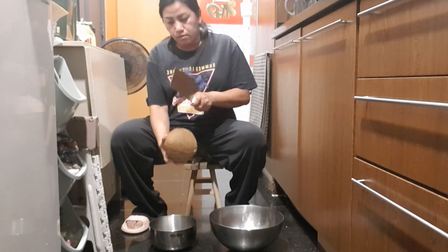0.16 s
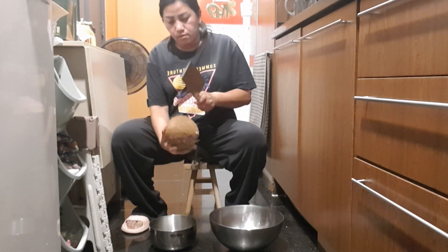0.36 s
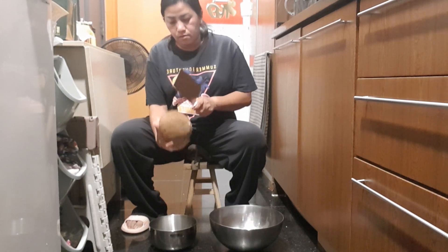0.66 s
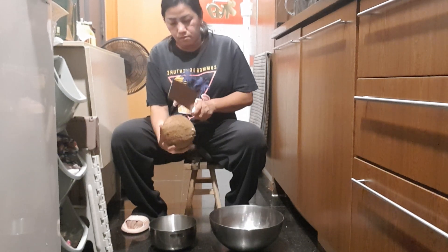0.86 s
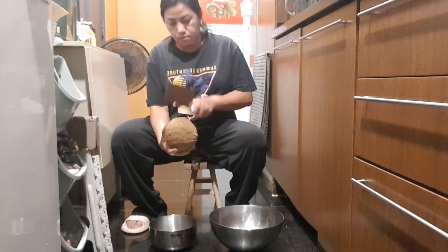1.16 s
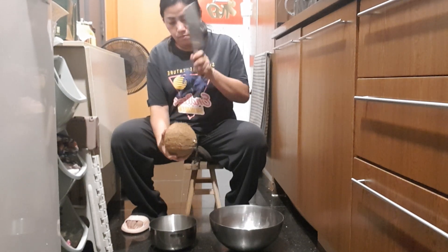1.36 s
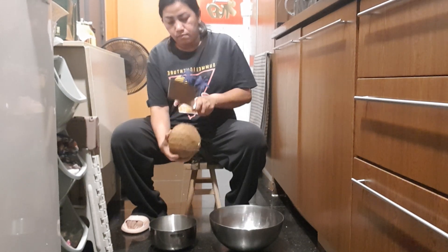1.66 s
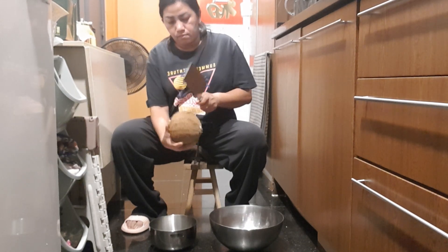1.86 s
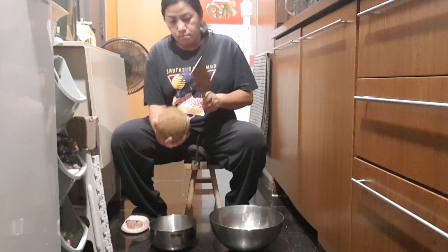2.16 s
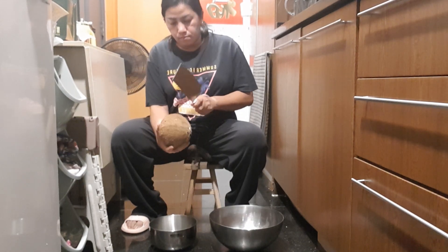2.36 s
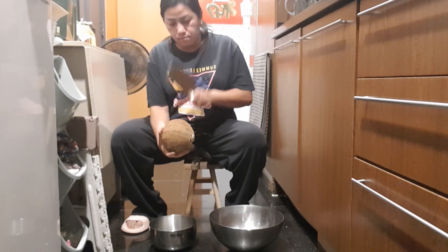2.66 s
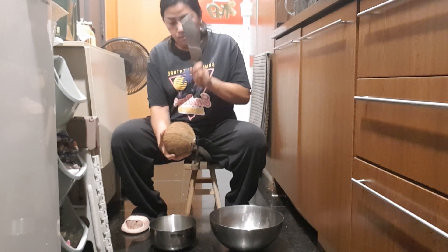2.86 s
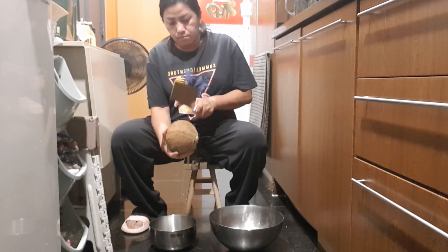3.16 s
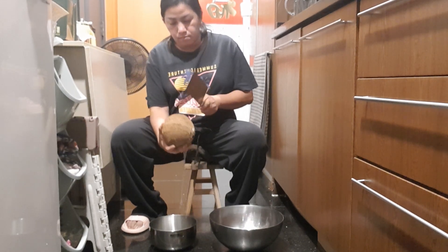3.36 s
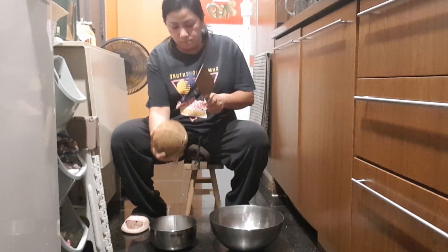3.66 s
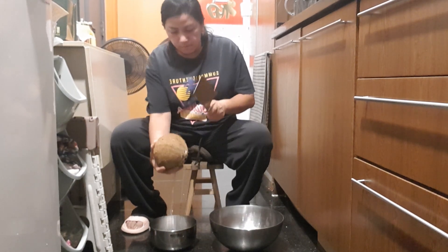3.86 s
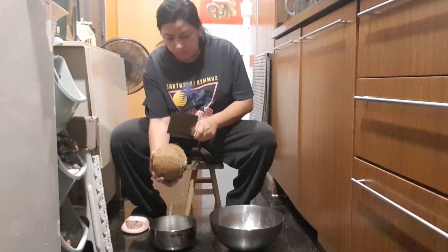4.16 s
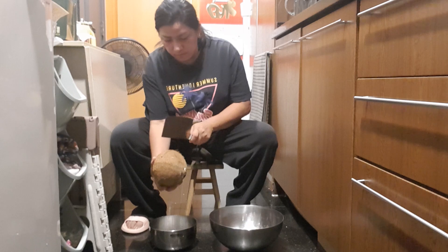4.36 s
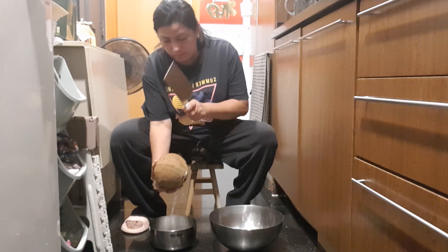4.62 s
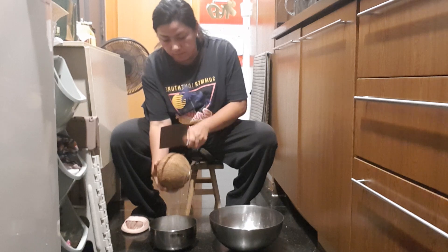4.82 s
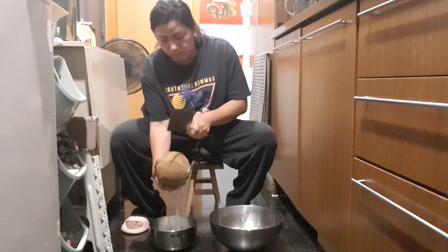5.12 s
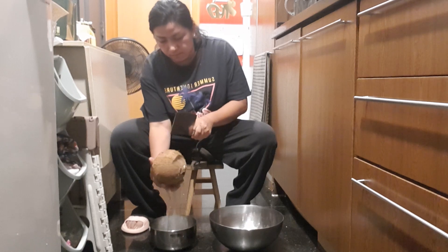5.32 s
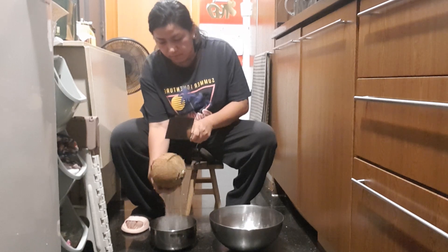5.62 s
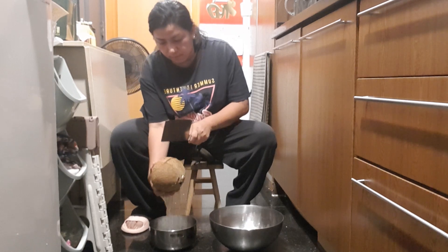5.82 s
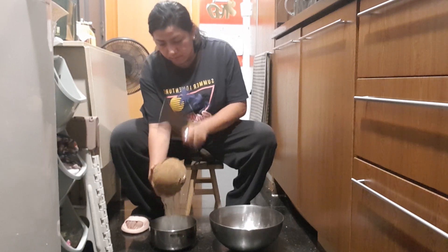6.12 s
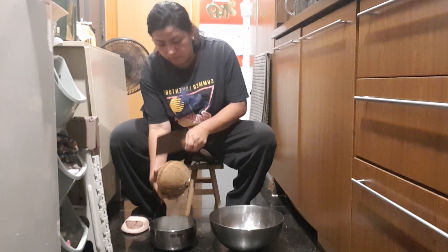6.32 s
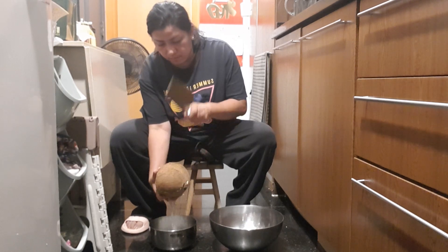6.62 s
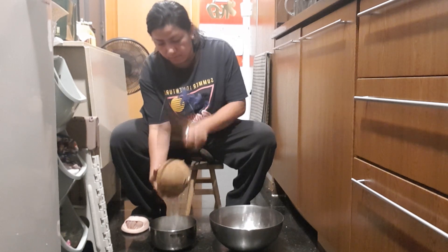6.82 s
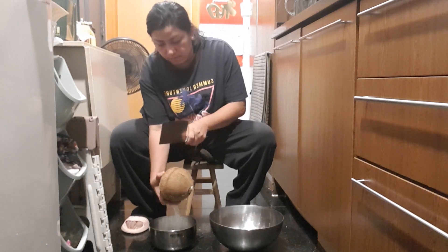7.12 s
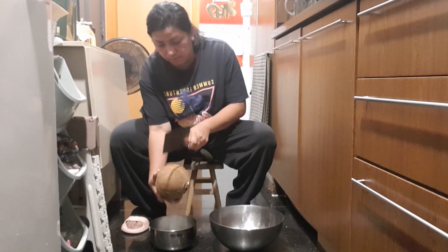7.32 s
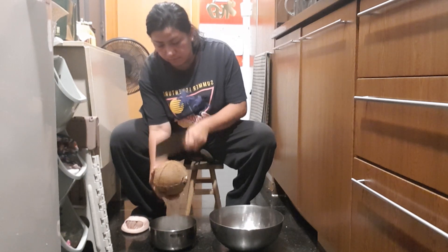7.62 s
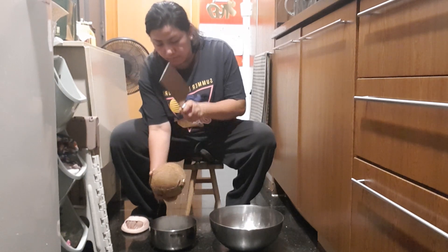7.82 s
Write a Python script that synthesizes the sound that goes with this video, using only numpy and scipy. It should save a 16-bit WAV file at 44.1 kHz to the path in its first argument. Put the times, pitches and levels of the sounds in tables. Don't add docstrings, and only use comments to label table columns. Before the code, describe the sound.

Sharp, dry knocks of a heavy blade on hard shell, each with a brief steel ring and short room slap. Soft fibre rustles come between early blows. After the splitting hit, single drops and a thin splashy trickle land in a metal bowl while the knocks turn hollow and boomy. Low fan rumble runs throughout, with a fridge hum rising past five seconds, heard from a phone on the floor nearby.

```python
import sys
import numpy as np
from scipy import signal
from scipy.fft import rfft, irfft, next_fast_len
from scipy.io import wavfile
from scipy.ndimage import uniform_filter1d

SR = 44100
rng = np.random.default_rng(int(sys.argv[2]) if len(sys.argv) > 2 else 0)


def field_ratio(decibels):
    return 10 ** (np.asarray(decibels, dtype=float) / 20)


def unload_audio(sound):
    columns = np.transpose(np.atleast_2d(sound))
    steps = np.round(np.clip(columns, -1, 1) * 32767)
    wavfile.write(sys.argv[1], SR, steps.astype(np.int16))


N = 351918
TIME = np.arange(N) / SR
ONSET_DELAY_S = 0.0012

# frequency in Hz, density in dB per Hz.
HUM_SPECTRUM = [(15, -45.5), (27, -20), (59, 0), (99, -2.5), (129, -5.5), (324, -14), (361, -11),
                (460, -12), (498, -14), (555, -11.5), (977, -22), (1090, -23.5), (2510, -32), (7380, -62),
                (11000, -47.5), (15700, -55.5)]
# frequency in Hz, correlation from 0 to 1.
PORT_LIKENESS = [(40, .45), (75, .8), (130, 0.95), (300, 0.95), (640, 0.45), (1400, 0.13)]
# frequency in Hz, level in dB.
LEFT_EXCESS = [(40, 6.5), (130, .5), (400, 2), (1300, 1.5), (2400, 5.5), (5000, 6), (15000, 5)]
# start in seconds, blade edge in dB, shell body in dB, cavity in Hz, cavity in dB.
BLOWS = [
    (0.08, -9, -16, 363, -33.5),
    (0.9714, -32, -34, 393, -48),
    (1.574, -8, -14, 354, -26.5),
    (2.539, -29, -24, 386, -32.5),
    (3.004, -10.5, -14.5, 355, -11.5),
    (4.822, -12, -14.5, 380, -10),
    (6.203, -11.5, -12.5, 325.7, -6.5),
    (6.892, -13.5, -10, 373, -5),
    (7.496, -54, -39, 313, -19),
    (7.9735, -13, -13.5, 393, -11.5),
]
# frequency in Hz, level in dB, T60 in seconds.
SHELL_MODES = [(496, -4, 0.031), (575, -6, 0.022), (720, -4, 0.0076), (891, -11.5, 0.054),
               (1120, -9, 0.004), (1330, -11, 0.0029)]
# ratio to the knock frequency, level in dB, T60 in seconds.
KNOCK_PARTIALS = [(0.751, -13.5, 0.002), (1.35, 7, 0.0027)]
# centre in Hz, T60 in seconds, early reflections in dB.
ROOM_BANDS = [(141, 0.33, 11.5), (560, 0.27, -9.5), (2300, .32, 3.5), (10000, 0.31, 6)]
# frequency in Hz, gain in dB.
PORT_RESPONSE = [(30, -26), (90, 2.5), (200, 1.5), (3000, -1), (5500, -7), (7400, -12.5), (8800, -2),
                 (10500, 0), (13000, -7), (16000, -8.5)]
# start in seconds, low blade modes in dB, long ring in dB, high blade modes in dB.
STEEL_RINGS = [
    (.08, -31, -53, -37),
    (.973, -45, -80, -70),
    (1.575, -21.5, -53.5, -48),
    (2.541, -59, -62.5, -52),
    (3.004, -24, -62.5, -41),
    (4.823, -40, -72, -53),
    (6.204, -54, -66, -27),
    (6.893, -31.5, -70, -56),
]
# frequency in Hz, level in dB, T60 in seconds.
BLADE_LOW_MODES = [(1995, 0, .4)]
# frequency in Hz, level in dB, T60 in seconds.
LONG_RING_MODES = [(3890, 0, 1.5), (3896, -9, 1.3)]
# frequency in Hz, level in dB, T60 in seconds.
BLADE_HIGH_MODES = [(5696, -8, .2), (6244, -5, .2), (8455, -5, .28), (9150, -4, .18), (9685, -7, .25)]
# middle in seconds, length in seconds, level in dB.
HUSK_TURNS = [
    (0.568, 0.098, -60.5),
    (0.694, 0.11, -65.5),
    (2.037, 0.2, -63),
    (2.167, 0.1, -76),
]
# frequency in Hz, level in dB, T60 in seconds.
BOWL_MODES = [(854, -1, .3), (861, -5, .25), (1410, -1, .3), (1420, -6, .2), (2950, -8, .08),
              (4330, -8, .08)]
# time in seconds, flow in dB.
FLOW = [(3.2, -80), (3.4, -70), (3.57, -74.5), (3.68, -53), (3.81, -66), (4.06, -56), (4.22, -63.5),
        (4.4, -56.5), (4.55, -55), (4.8, -74.5), (5.0, -55.5), (5.22, -55.5), (5.5, -50.5), (5.65, -50.5),
        (6.3, -53), (6.6, -55), (7.14, -60.5), (7.98, -63.5)]
# start in seconds, splash in dB, bubble in Hz, bubble in dB.
DROPS = [(2.939, -62.5, 1800, -66.5), (3.3074, -44, 1600, -81), (3.3428, -43, 1520, -76),
         (3.4231, -40.5, 4050, -64), (3.6104, -38, 1500, -66), (3.7068, -32.5, 4430, -45.5),
         (3.8472, -27, 4070, -44), (3.9644, -34.5, 1940, -53), (4.0294, -43, 6160, -49),
         (4.0926, -41, 3200, -54), (4.2708, -43, 1620, -65), (4.374, -36, 4520, -47),
         (4.44, -30.5, 3000, -47), (4.5136, -35, 2950, -48), (4.559, -33, 4360, -45),
         (4.657, -35.5, 2350, -57), (5.0619, -31, 5400, -47), (5.1183, -32, 4360, -56),
         (5.445, -30.5, 1590, -52), (5.4982, -34, 4240, -46.5), (5.7172, -39.5, 3320, -42.5),
         (5.7527, -25.5, 1710, -40.5), (5.8561, -35, 2040, -51), (6.464, -44, 4200, -45.5),
         (6.6042, -45, 4250, -47.5), (7.0853, -39, 1900, -58), (7.3298, -44, 4120, -48),
         (7.5903, -38.5, 3060, -50.5), (7.6515, -35.5, 3050, -68), (7.7593, -54, 1900, -49)]
# start in seconds, level in dB.
WALL_TAPS = [
    (3.68, -57.5),
    (3.8472, -51.5),
    (3.9635, -57),
    (4.0294, -58),
    (4.0926, -56.5),
    (5.3389, -60),
]


def on_log(table, hz):
    table_hz, value = np.transpose(table)
    return np.interp(np.log(hz + 1), np.log(table_hz), value)


def unit(x):
    return x / np.sqrt(np.mean(x ** 2))


def band(x, lo_hz, hi_hz):
    sos = signal.butter(2, [lo_hz, min(hi_hz, SR / 2.2)], "band", fs=SR, output="sos")
    return signal.sosfilt(sos, x)


def ring(hz, t60_s, t):
    return np.sin(2 * np.pi * hz * t) * 1000. ** (-t / np.maximum(t60_s, .002))


def ring_all(modes, t, scatter_db, detune):
    out = np.zeros(len(t))
    for hz, db, t60_s in modes:
        strength, shift = rng.standard_normal(2)
        out += field_ratio(db + scatter_db * strength) * ring(hz * (1 + detune * shift), t60_s, t)
    return out


def add(track, start_s, x):
    i = int(start_s * SR)
    track[i:i + len(x)] += x[:N - i]


def ports(envelopes):
    hz = np.fft.rfftfreq(envelopes.shape[-1], 1 / SR)
    likeness = np.clip(on_log(PORT_LIKENESS, hz), 0, 1)
    mid, side = rfft(rng.standard_normal(envelopes.shape) * envelopes)
    common = np.sqrt(1 + likeness) * mid
    differing = np.sqrt(1 - likeness) * side
    lean = field_ratio(on_log(LEFT_EXCESS, hz) / 2)
    return hz, np.array([lean * (common + differing), (common - differing) / lean])


def hum():
    flicker = field_ratio(0.43 * unit(uniform_filter1d(rng.standard_normal((2, N)), 4000)))
    hz, pair = ports(flicker)
    air = irfft(pair * field_ratio(on_log(HUM_SPECTRUM, hz)), N)
    air *= field_ratio(-46) / np.std(air.mean(axis=0))

    start_s, rise_s, motor_hz, wobble_hz = 5.3, 0.49, 135.7, 6.23
    motor_db, throb_db, ease_start_s, ease_db_per_s = -48, 4, 7.3, -11.5
    running = np.clip((TIME - start_s) / rise_s, 0, 1)
    wobble = unit(uniform_filter1d(rng.standard_normal(N), 1500))
    phase = 2 * np.pi * np.cumsum(motor_hz + wobble_hz * wobble) / SR
    level_db = motor_db + throb_db * np.roll(wobble, SR)
    level_db += ease_db_per_s * np.maximum(TIME - ease_start_s, 0)
    return air + np.sqrt(2) * running * field_ratio(level_db) * np.sin(phase)


def blow_low(edge_db, cavity_hz, cavity_db, force_db, splits, t):
    thump_db, thump_t60_s = (-14, 0.22) if splits else (edge_db - 14.5, .08)
    cavity_t60_s = 0.049 * np.exp(-0.024 * force_db)
    thump = ring(118, thump_t60_s, t) + 0.78 * ring(205, thump_t60_s, t)
    cavity = ring(cavity_hz, cavity_t60_s, t) + 0.52 * ring(1.14 * cavity_hz, 0.038, t)
    low = field_ratio(thump_db - 1) * thump + field_ratio(cavity_db + 5.5) * cavity
    return low * (1 - np.exp(-t / 0.0023))


def blow_contact(edge_db, body_db, force_db, opened, t):
    knock_hz = 2018 + 12 * force_db
    knock = [(knock_hz, 0, 0.0044 * np.exp(-.04 * force_db))]
    knock += [(ratio * knock_hz, db, t60_s) for ratio, db, t60_s in KNOCK_PARTIALS]
    open_db = -4 * opened
    hit = field_ratio(body_db + 7) * ring_all(SHELL_MODES, t, scatter_db=4.0, detune=0.02)
    hit += field_ratio(edge_db + open_db + 14) * ring_all(knock, t, scatter_db=1.05, detune=0.012)
    return band(hit, 260, 2400)


def blow_fibres(force_db, opened, t):
    grit = 0.45 * rng.standard_normal((2, len(t))) * np.exp(-t / 0.0054)
    grit[:, 0] += 4
    splinter_db = -10 + 1.51 * force_db
    crack_db = -25 + 1.85 * force_db + 6 * opened
    splinters = field_ratio(splinter_db + 14) * band(grit[0], 3670, 6770)
    return splinters + field_ratio(crack_db + 23) * band(grit[1], 7000, 15000)


def blows():
    split_s, full_blow_db = 3.003, -10
    hits, boom, t = np.zeros(N), np.zeros(N), TIME[:SR // 4]
    for start_s, edge_db, body_db, cavity_hz, cavity_db in BLOWS:
        opened = start_s > split_s + 1
        splits = abs(start_s - split_s) < .1
        force_db = edge_db - full_blow_db
        low = blow_low(edge_db, cavity_hz, cavity_db, force_db, splits, t)
        hit = blow_contact(edge_db, body_db, force_db, opened, t)
        hit += blow_fibres(force_db, opened, t)
        add(hits, start_s + ONSET_DELAY_S, hit + field_ratio(-5) * low)
        add(boom, start_s + ONSET_DELAY_S, low)
    return hits, boom


def reflections():
    early_s, rise_s = 0.0036, .0004
    t, response = TIME[:2 ** 15], 0
    for centre_hz, t60_s, early_db in ROOM_BANDS:
        fade = 1000. ** (-t / t60_s)
        fade *= (1 + field_ratio(early_db) * np.exp(-t / early_s)) * (1 - np.exp(-t / rise_s))
        hz, pair = ports(np.array([fade, fade]))
        share = on_log([(f, float(f == centre_hz)) for f, *_ in ROOM_BANDS], hz)
        response = response + np.sqrt(share) * pair / np.sqrt(2 * np.sum(fade ** 2))
    return irfft(response * field_ratio(on_log(PORT_RESPONSE, hz)))[:, :-2 ** 13]


def room(x):
    count, places_per_s = 6, 61.3
    size = next_fast_len(N + 2 ** 15)
    place = TIME * places_per_s % count
    total = 0
    for k in range(count):
        distance = np.abs((place - k + count / 2) % count - count / 2)
        stay = np.sqrt(np.clip(1 - distance, 0, 1))
        total = total + rfft(reflections(), size) * rfft(x * stay, size)
    return irfft(total, size)[:, :N]


def steel():
    out = np.zeros((2, N))
    for start_s, low_db, long_db, high_db in STEEL_RINGS:
        groups = ((low_db, BLADE_LOW_MODES), (long_db, LONG_RING_MODES), (high_db, BLADE_HIGH_MODES))
        for side in out:
            for db, modes in groups:
                tone = ring_all(modes, TIME[:SR], scatter_db=1.5, detune=.0001)
                add(side, start_s + ONSET_DELAY_S, field_ratio(db) * tone)
    return out


def grains(rate_per_s, spread_db):
    clicks = (rng.random(N) < rate_per_s / SR) * rng.standard_normal(N)
    return unit(clicks * field_ratio(spread_db * np.minimum(rng.exponential(size=N), 4)))


def husk():
    turning = np.zeros(N)
    for middle_s, length_s, db in HUSK_TURNS:
        turning += field_ratio(db) * np.exp(-(2 * (TIME - middle_s) / length_s) ** 2)
    return turning * unit(band(grains(9000, spread_db=9.0), 4900, 16000))


def bowl(push, ringing=1):
    t = TIME[:SR // 2]
    response = sum(field_ratio(db) * ring(hz, ringing * t60_s, t) for hz, db, t60_s in BOWL_MODES)
    return signal.fftconvolve(push, response)[:N]


def trickle():
    flow_s, flow_db = np.transpose(FLOW)
    spray_db = np.interp(TIME, flow_s, flow_db, -120)
    gurgle_db = spray_db - 7 + 3 * (TIME - flow_s[0])
    drum_db = np.minimum(-58 + 2.5 * (gurgle_db + 59.5), -55.5)
    spray = unit(band(grains(1200, spread_db=5.5), 4500, 15000))
    bubbles = np.zeros(N)
    for hz in 1700 * 1.12 ** np.arange(13):
        bubbles += band(grains(36, spread_db=3.5), hz, 1.14 * hz)
    patter = unit(band(grains(1700, spread_db=0.5), 1200, 6400))
    drumming = unit(bowl(grains(90, spread_db=4.0), ringing=.25))
    out = field_ratio(spray_db) * spray
    out += field_ratio(gurgle_db) * (0.54 * unit(bubbles) + 0.35 * patter)
    return out + field_ratio(drum_db - 13) * drumming


def drops():
    t, out, taps = TIME[:SR // 10], np.zeros(N), np.zeros(N)
    for start_s, splash_db, bubble_hz, bubble_db in DROPS:
        spatter = 0.22 * rng.standard_normal(len(t)) * np.exp(-t / 0.005)
        splash = band((t == 0) * 3 + spatter, 3860, 17000)
        bubble = ring(bubble_hz * (1 + 1.3 * t), .016, t)
        add(out, start_s, field_ratio(splash_db + 3) * splash + field_ratio(bubble_db + 8) * bubble)
        taps[int(start_s * SR)] = field_ratio(-73)
    for start_s, db in WALL_TAPS:
        taps[int(start_s * SR)] = field_ratio(db)
    return out + bowl(taps)


def scene():
    background = hum()
    hits, boom = blows()
    water = trickle() + drops()
    wet = room(hits + field_ratio(-1.5) * husk() + field_ratio(8.0) * water)
    return wet + boom + steel() + background


def band_limit(x):
    return signal.sosfilt(signal.butter(12, 16510, fs=SR, output="sos"), x)


def record(dry):
    low_pass = signal.ellip(6, .3, 40, 15800, fs=SR, output="sos")
    mix = np.tanh(signal.sosfilt(low_pass, dry) / 1.015) * 1.033
    return band_limit(mix)


dry = scene()
out = record(dry)
unload_audio(out)
```